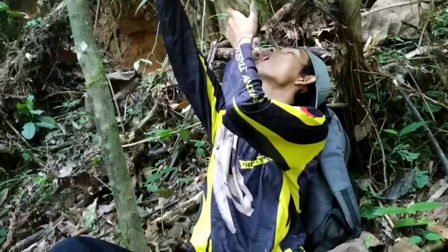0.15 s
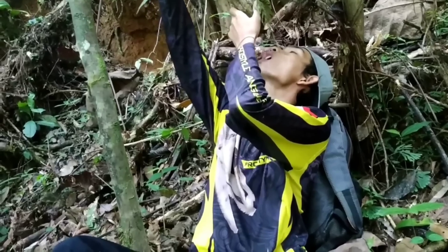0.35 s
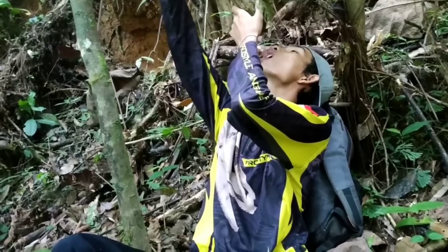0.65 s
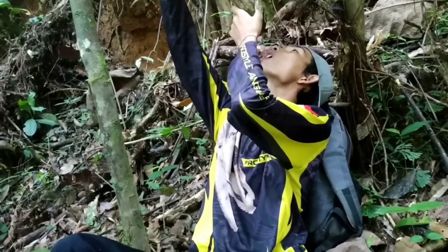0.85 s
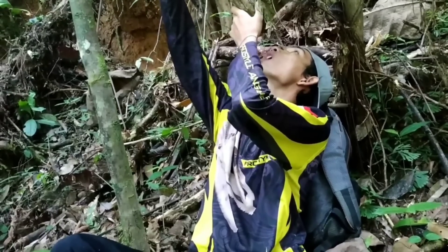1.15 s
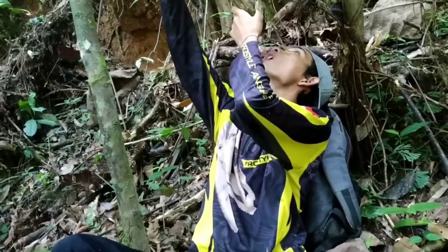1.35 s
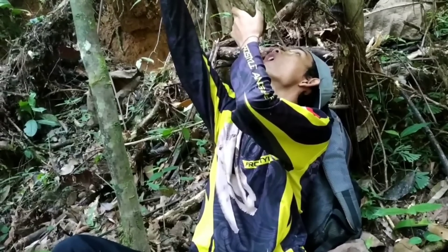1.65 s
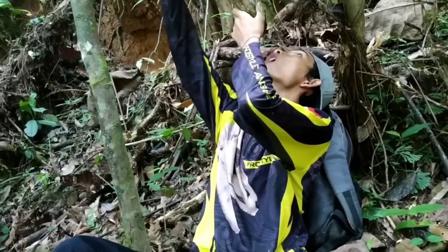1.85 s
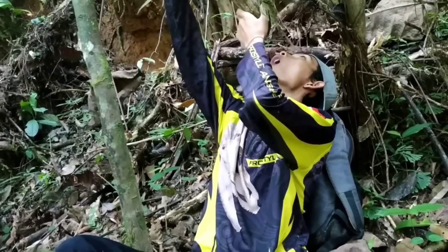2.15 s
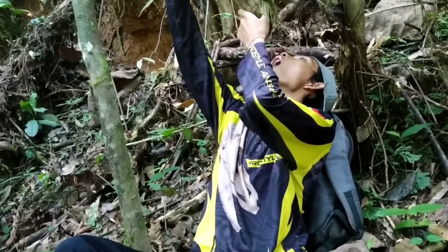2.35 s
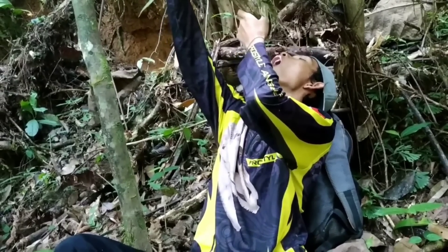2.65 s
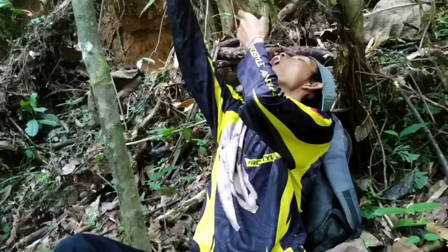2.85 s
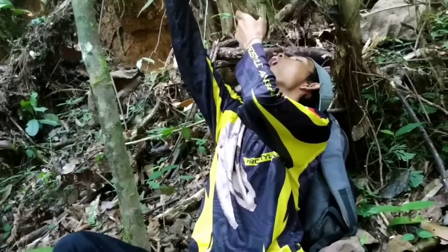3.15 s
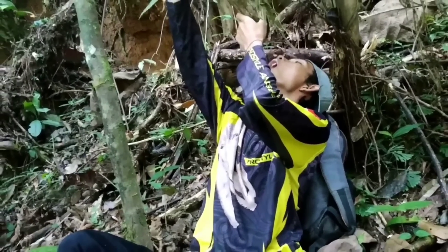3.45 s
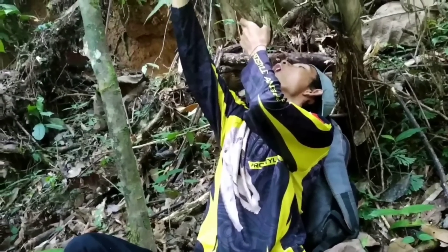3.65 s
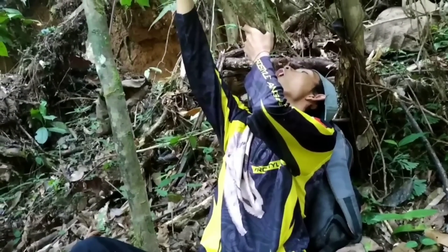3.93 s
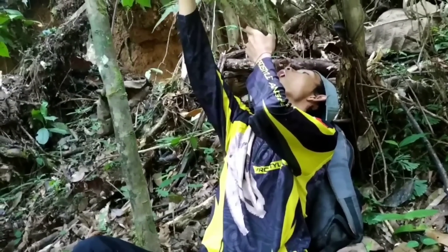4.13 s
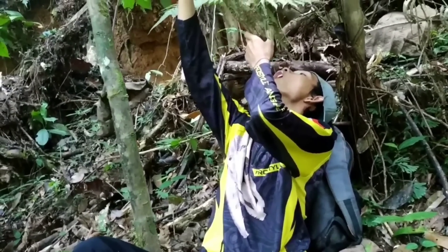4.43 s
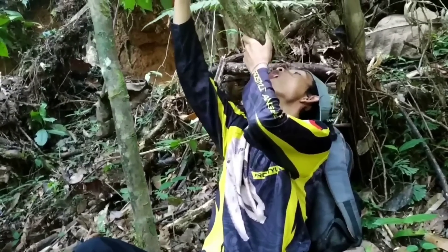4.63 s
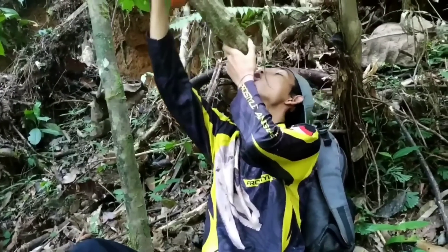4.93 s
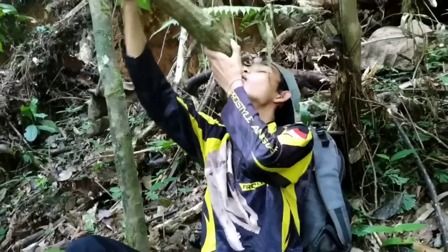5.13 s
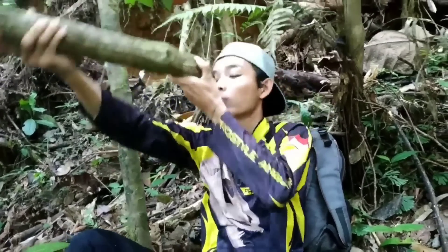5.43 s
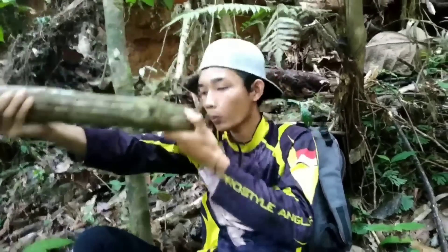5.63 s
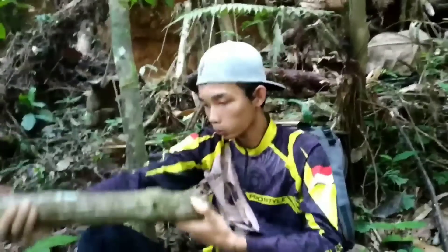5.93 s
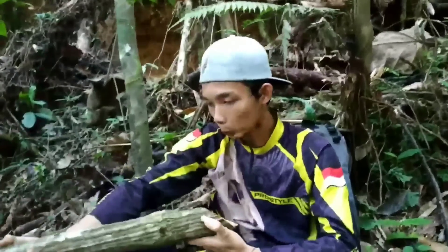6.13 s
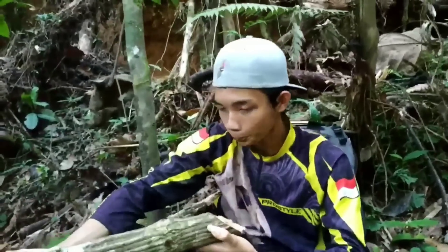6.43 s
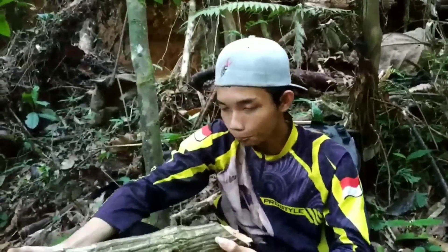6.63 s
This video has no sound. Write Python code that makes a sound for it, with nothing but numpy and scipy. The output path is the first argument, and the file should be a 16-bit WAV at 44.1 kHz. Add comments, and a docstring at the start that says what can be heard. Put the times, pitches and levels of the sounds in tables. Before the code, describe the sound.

In a jungle by day, a high, hissing insect chorus carries on throughout, with short, thin buzzes alternating closer in. Light leaf crackles and a brief upward bird chirp come early, followed by faint far whistles. In the second half two sharp twig snaps stand out nearby, with another chirp between them. The stereo sound is wide, and nearer sounds echo softly among the trunks.

```python
"""A rainforest by day. Far cicadas and katydids click into their resonances and blur into a high drone
over a low murmur. Two nearer insects buzz their wings in turn about once a second, leaves rustle,
stems tick, a bird whips upward twice, faint tones whistle far off and two twigs snap close by.
Trunks scatter a long echo. Two spaced microphones; most sound reaches the right one first."""
import sys
import numpy as np
from scipy import signal
from scipy.fft import rfft, irfft, next_fast_len
from scipy.io import wavfile
from scipy.ndimage import uniform_filter1d, map_coordinates

SR = 44100
rng = np.random.default_rng(int(sys.argv[2]) if len(sys.argv) > 2 else 0)


def digitize_waveform(pressure):
    """Quantize a signal to 16-bit integers and store it at the path in sys.argv[1].

    Rows of a 2-D input are taken as channels; values are limited to [-1, 1].
    """
    field = np.atleast_2d(pressure).T
    bounded = np.clip(field, -1, 1)
    quanta = np.round(bounded * 32767).astype(np.int16)
    wavfile.write(sys.argv[1], SR, quanta)


N = 298998
T = np.arange(N) / SR
LAG_S = 0.0004436  # left microphone behind right


def amp(db):
    return 10 ** (np.asarray(db) / 20)


def unit(x):
    return x / np.sqrt(np.mean(x ** 2) + 1e-20)


def phase(hz):
    return 2 * np.pi * np.cumsum(hz) / SR


def along(points, hz):
    """Interpolate (frequency, value) points on a log axis."""
    f, v = np.transpose(points)
    return np.interp(np.log(hz + 1), np.log(f + 1), v)


def wobble(rate_hz):
    """Smooth random curve, rate_hz knots a second."""
    return map_coordinates(rng.standard_normal(int(N * rate_hz / SR) + 4), [T * rate_hz])


def filtered(x, response):
    """Apply a complex frequency response."""
    size = next_fast_len(N + SR // 2)
    return irfft(rfft(x, size) * response(np.fft.rfftfreq(size, 1 / SR)), size)[..., :N]


def modes(table, f):
    """Causal response of resonances, alternating in sign."""
    return sum((-1) ** k * amp(db) * 1j * f * width / (hz * hz - f * f + 1j * f * width)
               for k, (hz, width, db) in enumerate(table))


def pan(pan_db):
    """Channel gains; pan_db is left minus right."""
    return amp([[pan_db / 2], [-pan_db / 2]])


def placed(x, pan_db, lag_s=LAG_S):
    """Point source at both microphones, left delayed."""
    return pan(pan_db) * np.array([np.pad(x, (round(lag_s * SR), 0))[:N], x])


def patched(pair, patchy_db):
    """Random gain patches over time and frequency."""
    spectra = signal.stft(pair, nperseg=512)[2]
    field = uniform_filter1d(rng.standard_normal(spectra.shape[1:]), size=5, axis=0)
    field = uniform_filter1d(field, size=10, axis=1)
    return signal.istft(spectra * amp(patchy_db * unit(field)), nperseg=512)[1][:, :N]


def clicks(rate_hz, blur):
    """Two channels of random clicks; blur is the share of power that is hiss."""
    hits = (rng.random((2, N)) < rate_hz / SR) * rng.standard_normal((2, N))
    return np.sqrt(1 - blur) * unit(hits) + np.sqrt(blur) * rng.standard_normal((2, N))


# Left-right likeness: (frequency [Hz], coherence [0-1])
COHERENCE = [(60, 0.89), (250, 0.84), (500, 0.82), (1000, 0.23), (3000, 0.2), (6000, 0.047), (15000, 0.03)]
# Field balance: (frequency [Hz], left minus right [dB])
BALANCE = [(60, -1), (150, 1), (380, -0.5), (950, 0.5), (2380, 2), (5980, 5.0), (15000, 0)]


def diffuse(pair, colour, patchy_db):
    """Diffuse field, mono rms 1. Bass arrives from all sides, which shortens its lag."""
    def mid_side(hz):
        angle = np.arccos(along(COHERENCE, hz)) / 2
        return colour(hz) * [np.cos(angle), np.sin(angle)]

    def microphones(hz):
        lag_s = LAG_S * np.clip(hz / 900, .3, 1)
        half_db = along(BALANCE, hz) / 2
        return [amp(half_db) * np.exp(-2j * np.pi * hz * lag_s), amp(-half_db)]

    mid, side = filtered(patched(pair, patchy_db), mid_side)
    both = filtered(np.array([mid + side, mid - side]), microphones)
    return both / np.sqrt(np.mean(both.mean(0) ** 2))


# Cicada drum modes, before the exponent: (centre [Hz], width [Hz], gain [dB])
DRUM_MODES = [(4290, 610, -6.5), (5160, 790, 0), (5980, 940, -3.5)]


def cicadas():
    """Drum clicks blurred by distance; the exponent steepens the resonances."""
    return diffuse(clicks(1500, blur=.74), lambda f: modes(DRUM_MODES, f) ** 1.43, patchy_db=.8)


# Katydid wing modes, before cubing: (centre [Hz], width [Hz], gain [dB])
WING_MODES = [(13516, 600, 1.5), (13980, 690, 5), (14440, 700, 2.5)]


def katydids():
    """Unsynchronised clicks ring the wings in a narrow high band."""
    return diffuse(clicks(1200, blur=.91), lambda f: modes(WING_MODES, f) ** 3, patchy_db=1.2)


# Farthest insects: (frequency [Hz], relative density [dB])
FIZZ_SPECTRUM = [(1760, -100), (3000, -33), (3170, -21), (3540, -3), (5400, -12.5), (7130, -1.5),
                 (7860, -12), (8780, -4), (10600, -7), (11700, -7), (12400, -4), (12800, -14), (13200, -14),
                 (14800, -21), (15200, -16), (15700, -30)]


def fizz():
    """Insects so distant that only hiss remains."""
    return diffuse(rng.standard_normal((2, N)), lambda f: amp(along(FIZZ_SPECTRUM, f)), patchy_db=2.5)


# Forest murmur: (frequency [Hz], relative density [dB])
MURMUR_SPECTRUM = [(15, -66), (25, -32), (113, -18), (223, 0), (421, -8), (555, -6.5), (849, -8.5),
                   (1100, -11), (1300, -13), (1440, -13.5), (1750, -13), (2910, -14), (4000, -14),
                   (5200, -82), (8800, -120)]


def murmur():
    """Steady low noise from all around."""
    return diffuse(rng.standard_normal((2, N)), lambda f: amp(along(MURMUR_SPECTRUM, f)), patchy_db=1.78)


# Chorus levels: (time [s], cicadas [dB], fizz [dB], katydids [dB])
CHORUS_LEVELS = [(0, -37.5, -44, -45), (1.2, -38, -43.5, -45), (2.5, -38.5, -43.5, -44.5),
                 (3.9, -38.5, -44, -45), (4.6, -38.5, -42.5, -45), (5.1, -39.5, -45, -42.5),
                 (5.4, -37.5, -42, -44.5), (5.7, -39, -44, -42.5), (6.2, -41.5, -44.5, -41.5),
                 (6.78, -41, -46, -42)]


def drone(murmur_db=-49):
    """Three drifting choruses over the murmur; fizz and katydids flicker."""
    times_s, *levels_db = np.transpose(CHORUS_LEVELS)
    cicada_db, fizz_db, katydid_db = [np.interp(T, times_s, db) for db in levels_db]
    return (cicadas() * amp(cicada_db)
            + katydids() * amp(katydid_db + .56 * wobble(11))
            + fizz() * amp(fizz_db + .78 * wobble(14))
            + murmur() * amp(murmur_db))


def insect(first_s, gap_s, shrink_s, length_s, first_db, fade_db, low_hz, bend_hz, width_hz, pulse_hz):
    """Seven quickening, fading buzzes of uneven wing pulses; each sinks in pitch, then jumps up."""
    swell, hz = np.zeros(N), np.full(N, float(low_hz))
    for k in range(7):
        centre_s = first_s + k * gap_s - shrink_s * k * (k - 1) / 2
        u = np.clip(2 * (T - centre_s) / length_s, -1, 1)
        active = abs(u) < 1
        swell += amp(first_db - fade_db * k) * np.abs(np.cos(np.pi * u / 2)) ** .62 * active
        hz += bend_hz * np.where(u < .3, (.3 - u) / 1.4, (u - .3) / .51) ** 1.6 * active
    pulses = 1 + .8 * np.cos(phase(pulse_hz * (1 + .1 * wobble(60))))
    band = wobble(width_hz) * np.cos(phase(hz)) + wobble(width_hz) * np.sin(phase(hz))
    return swell * unit(pulses * band)


# Leaf crackle: (frequency [Hz], relative density [dB])
LEAF_SPECTRUM = [(300, -15), (700, -4), (1250, -6.5), (1700, 0.5), (2500, 3.5), (4500, -0.5), (8000, -1),
                 (12000, -2), (16000, -11)]
# Rustles: (time [s], rise [s], hold [s], mid level [dB], bass re mid [dB], treble re mid [dB], pan [dB])
LEAF_RUSTLES = [(0.8, .01, 0.12, -53.5, -17, 11, 0), (1.358, .012, 0.048, -54, 1, 19, 0.5),
                (1.435, .02, 0.045, -54, 6, 19, 0.5), (1.903, .005, 0.045, -47.5, -24, 5, 1),
                (2.378, .005, 0.038, -54, -0.5, 14, 0), (4.071, .006, 0.09, -42, -0.5, 10, 3),
                (5.968, .01, 0.21, -56, 1.5, -11, 7.5), (6.221, .002, 0.021, -38, -10.5, 7, 1.5)]


def leaves():
    """Three-band crackle that rises, holds and settles; louder rustles settle more slowly."""
    grains = patched(clicks(3000, blur=.35), patchy_db=3.5)  # each leaf colours its own moment
    crackle = filtered(grains, lambda f: amp(along(LEAF_SPECTRUM, f)))
    bass, low = [filtered(crackle, lambda f: 1 / (1 + (f / hz) ** 4)) for hz in (2230, 4250)]
    bass, mid, treble = unit(bass), unit(low - bass), unit(crackle - low)
    out = np.zeros((2, N))
    for start_s, rise_s, hold_s, db, bass_db, treble_db, pan_db in LEAF_RUSTLES:
        t60_s = .45 * 2 ** ((db + 45) / 12)
        falling_s = np.maximum(T - start_s - rise_s - hold_s, 0)
        envelope = np.clip((T - start_s) / rise_s, 0, 1) * amp(db - 60 * falling_s / t60_s)
        out += pan(pan_db) * envelope * (amp(bass_db) * bass + mid + amp(treble_db) * treble)
    return out * amp(.9 * wobble(250))


# Bird calls: (time [s], length [s], from [Hz], to [Hz], base level [dB])
BIRD_WHIPS = [(1.227, .056, 2200, 4900, -42.5), (5.172, .064, 1900, 4900, -43)]


def bird_whips(climb_db=2.5):
    """Quick, steepening upward sweeps, loudest past halfway."""
    out = np.zeros(N)
    for start_s, length_s, from_hz, to_hz, db in BIRD_WHIPS:
        u = np.clip((T - start_s) / length_s, 0, 1)
        hz = from_hz + (to_hz - from_hz) * (.45 * u + .55 * u * u)
        out += amp(db + climb_db * u) * np.abs(np.sin(np.pi * u)) ** .7 * np.sin(phase(hz))
    return placed(out, pan_db=-1, lag_s=.0003)


def canopy(x, t60_s=.1):
    """Foliage smears a call, differently for each microphone."""
    t = np.arange(SR // 10) / SR
    smear = rng.standard_normal((2, len(t))) * amp(-60 * t / t60_s)
    return x + .9 * signal.fftconvolve(x, smear / np.linalg.norm(smear[0]), axes=1)[:, :N]


# Short ringing ticks: small stems among the leaves, and at 6.249 s a low hollow knock after the snap: (time
# [s], level [dB], pitch [Hz], t60 [s])
STEM_TICKS = [(1.376, -39, 1950, .05), (1.413, -39, 1740, .04), (1.467, -38, 2480, .05),
              (1.469, -46, 1780, .04), (1.486, -35.5, 1750, .05), (1.508, -38, 1820, .05),
              (1.58, -45, 2350, .03), (1.925, -41, 2045, 0.085), (4.088, -31, 2100, 0.034),
              (4.101, -24, 5000, .03), (4.12, -33, 3150, .03), (4.139, -37, 2200, 0.033),
              (6.235, -33, 2220, .03), (6.249, -30.5, 740, .05), (6.252, -18, 3420, .02),
              (6.266, -31, 2430, 0.025), (6.298, -22, 3320, .03)]


def stem_ticks(attack_s=.00046):
    """Each tick rings briefly on its own pitch."""
    out, t = np.zeros(N + SR), np.arange(4096) / SR
    for start_s, db, hz, t60_s in STEM_TICKS:
        envelope = amp(db - 60 * t / t60_s) * (1 - np.exp(-t / attack_s))
        out[round(start_s * SR):][:len(t)] += envelope * np.sin(2 * np.pi * hz * t)
    return placed(out[:N], pan_db=2.4)


# Far bird tones: (time [s], length [s], pitch [Hz], level [dB])
FAR_WHISTLES = [(3.02, .07, 4250, -53), (3.45, 0.38, 1480, -62), (3.56, .07, 4100, -55),
                (6.27, .6, 1853, -56.5)]


def far_whistles():
    """Thin tones wavering in pitch and level."""
    out, drift_hz = np.zeros(N), 8 * wobble(30)
    for start_s, length_s, hz, db in FAR_WHISTLES:
        u = np.clip((T - start_s) / length_s, 0, 1)
        out += amp(db) * np.sin(np.pi * u) ** .21 * np.sin(phase(hz + drift_hz))
    return placed(out * amp(2.5 * wobble(30)), pan_db=8)


# Wood resonances: (centre [Hz], width [Hz], gain [dB])
WOOD_MODES = [(1850, 740, 2.5), (3050, 3200, 1.5), (4900, 2600, 3), (7360, 650, 8), (9780, 1500, 6.5),
              (14150, 1200, 8.5)]
# Hollow stem modes: (frequency [x knock pitch], gain [dB])
KNOCK_MODES = [(1.07, -4.5), (0.93, -3.5), (0.76, -6.5), (1.7, -13), (2.6, -13)]
# Fractures: (time [s], tear peak [dB], tilt [dB/octave], knock pitch [Hz], knock gain [dB], pan [dB])
TWIG_SNAPS = [(4.0621, -14, -1, 550, -19, 0), (4.0655, -16, -2, 550, -23, 0),
              (4.0775, -5.5, -1.5, 607, -12, 1.5), (6.131, -23, -6.5, 800, -17, 9),
              (6.2243, -6, -4, 844, -9.5, 3.5), (6.229, -14.5, -3, 700, -13, -1)]


def twigs(tear_t60_s=.014, knock_t60_s=.028, thump_t60_s=.066, thump_hz=222):
    """Tearing fibres excite the wood; the hollow stem knocks and the ground thumps."""
    out, t = np.zeros((2, N + SR)), np.arange(2048) / SR
    f = np.fft.rfftfreq(len(t), 1 / SR)
    thump = amp(-16.5 - 60 * t / thump_t60_s) * np.sin(2 * np.pi * thump_hz * t)
    for start_s, db, tilt_db, knock_hz, knock_db, pan_db in TWIG_SNAPS:
        envelope = amp(-60 * t / tear_t60_s) * (1 - np.exp(-t / .00036))
        fibres = envelope * rng.standard_normal((2, len(t)))
        tilt = amp(tilt_db * np.log2((f + 300) / 5000))
        tear = irfft(rfft(fibres) * modes(WOOD_MODES, f) * tilt)
        ring = sum(amp(mode_db - 60 * t / knock_t60_s) * np.sin(2 * np.pi * ratio * knock_hz * t)
                   for ratio, mode_db in KNOCK_MODES)
        knock = amp(knock_db) * (ring + thump) * (1 - np.exp(-t / .0031))
        snap = tear / abs(tear).max() + knock
        out[:, round(start_s * SR):][:, :len(t)] += amp(db) * pan(pan_db) * snap
    return out[:, :N]


# Echo decay: (frequency [Hz], t60 [s])
TRUNK_DECAY = [(300, 0.77), (2500, 2.16), (6000, 0.55), (14000, 0.027)]


def trunk_echo(x):
    """Scattering off trunks; each frequency decays at its own rate."""
    hz, t, spectra = signal.stft(rng.standard_normal((2, SR)), SR, nperseg=256)
    decay = amp(-60 * t / along(TRUNK_DECAY, hz)[:, None])
    tail = signal.istft(spectra * decay, SR, nperseg=256)[1]
    delayed = np.pad(x, ((0, 0), (250, 0)))
    return signal.fftconvolve(delayed, tail / np.linalg.norm(tail[0]), axes=1)[:, :N]


def scene():
    """Drone, insects, birds and foliage; the nearer sounds echo."""
    dipping = insect(first_s=.31, gap_s=.988, shrink_s=.02, length_s=.2, first_db=-43.5, fade_db=.25,
                     low_hz=9100, bend_hz=1400, width_hz=800, pulse_hz=800)
    answering = insect(first_s=.7, gap_s=.972, shrink_s=.006, length_s=.24, first_db=-44.5, fade_db=.87,
                       low_hz=8720, bend_hz=120.8, width_hz=1200, pulse_hz=280)
    insects = placed(dipping, pan_db=10.5) + placed(answering, pan_db=4.8)
    whips = bird_whips()
    hoarse_whips = whips * (1 + .6 * wobble(200))
    foliage = leaves() + stem_ticks() + twigs()
    echo = trunk_echo(amp(-5.5) * insects + amp(-12) * foliage + whips)
    return drone() + insects + foliage + canopy(hoarse_whips) + far_whistles() + echo


def record(dry, low_hz=120, top_hz=15500):
    """Microphone bass roll-off and recorder band limit."""
    return filtered(dry, lambda hz: (hz < top_hz) * 1j * hz / (low_hz + 1j * hz))


dry = scene()
out = record(dry)
digitize_waveform(out)
```